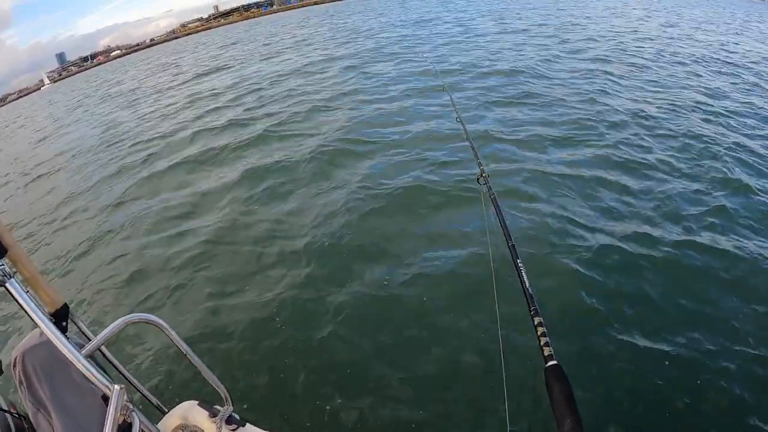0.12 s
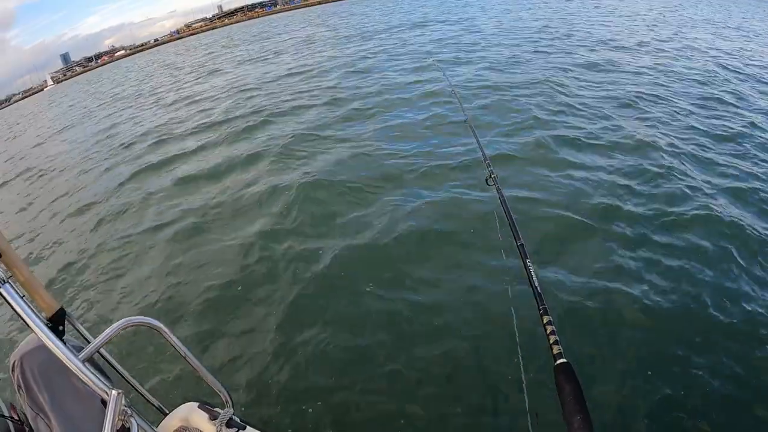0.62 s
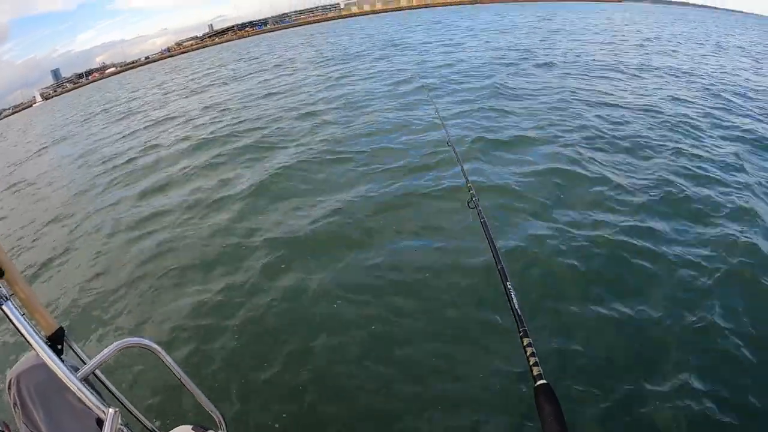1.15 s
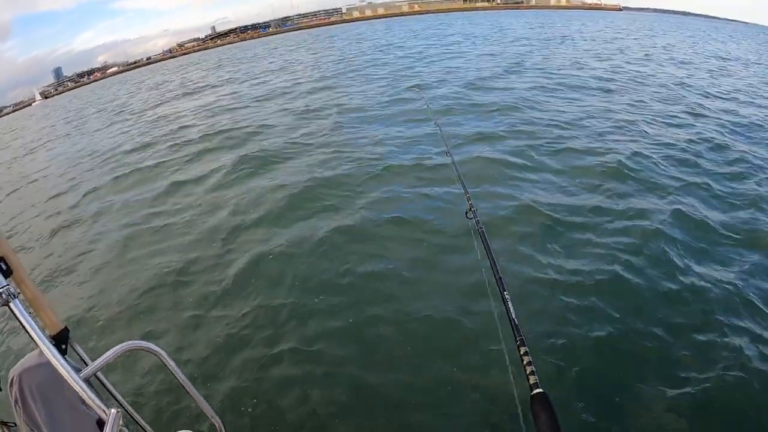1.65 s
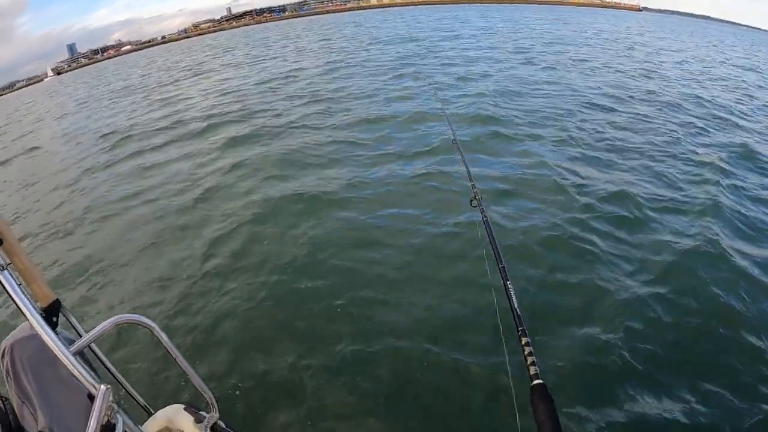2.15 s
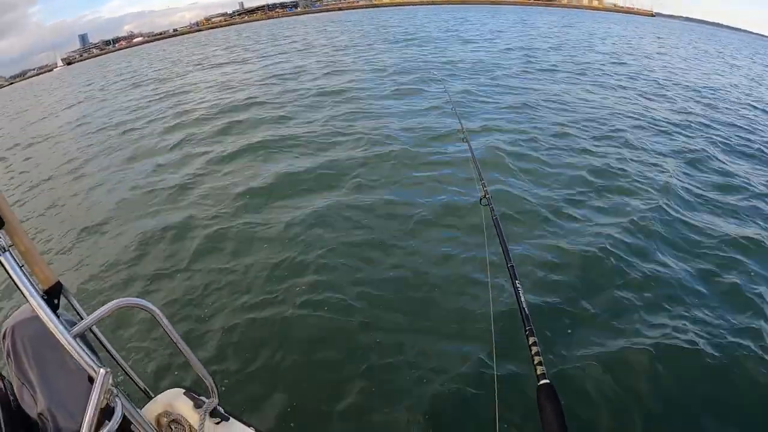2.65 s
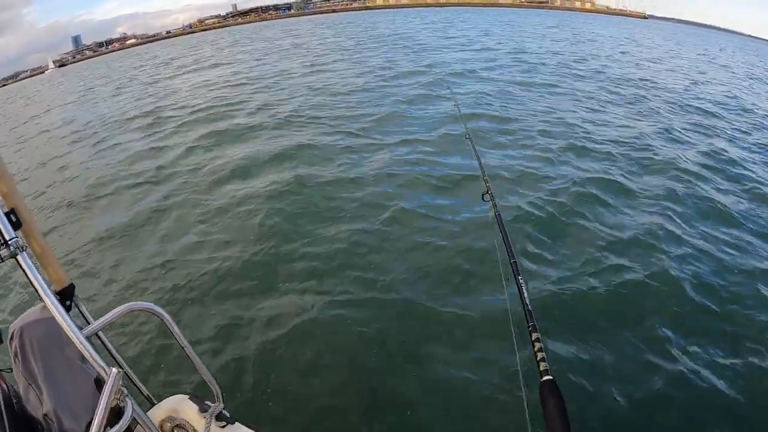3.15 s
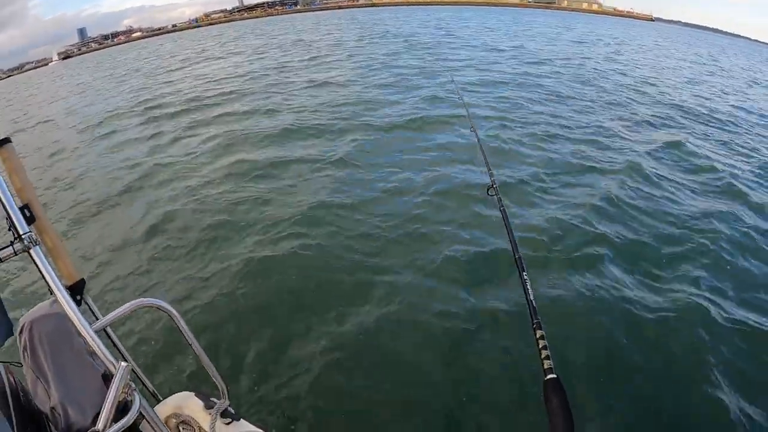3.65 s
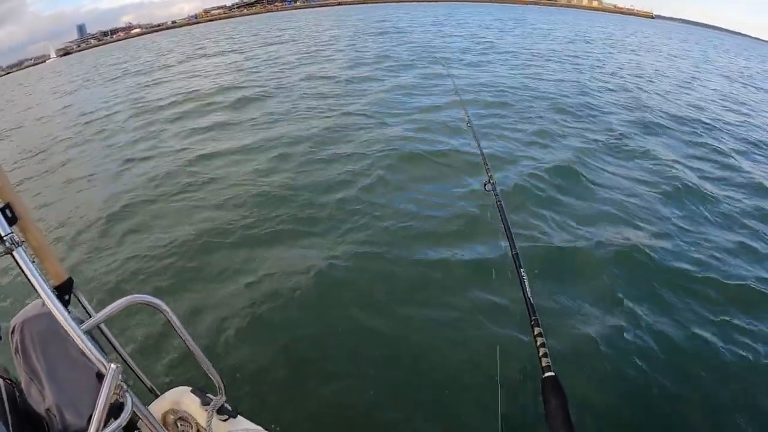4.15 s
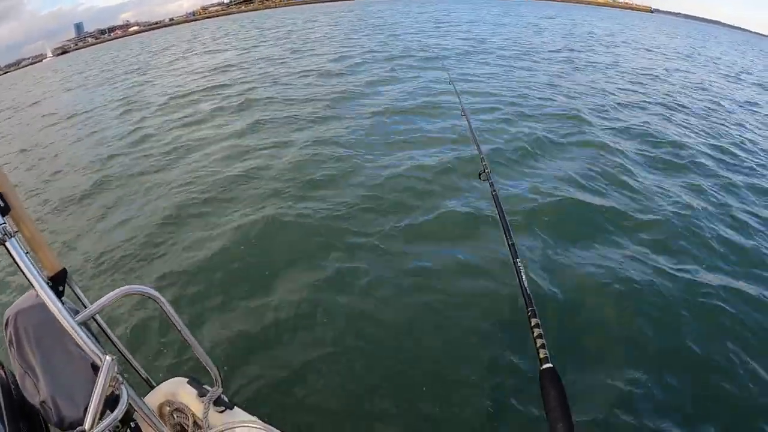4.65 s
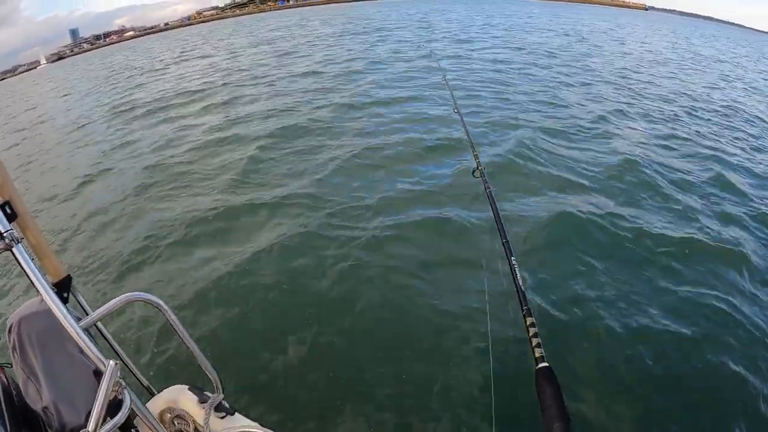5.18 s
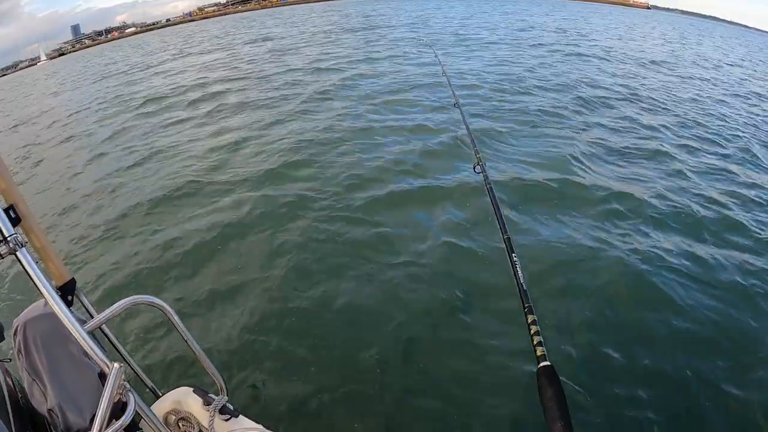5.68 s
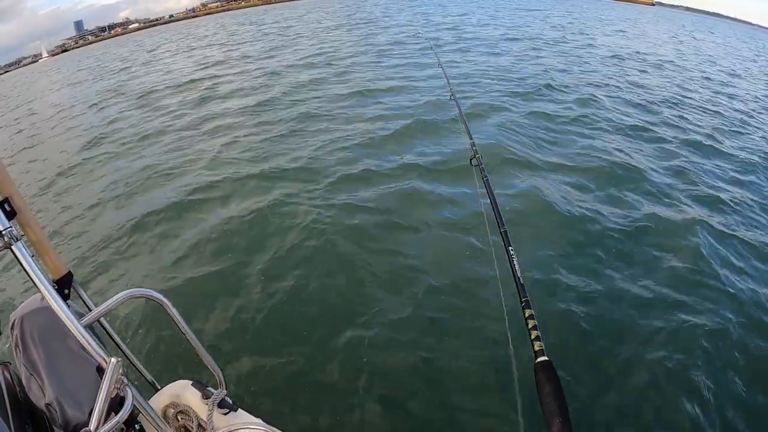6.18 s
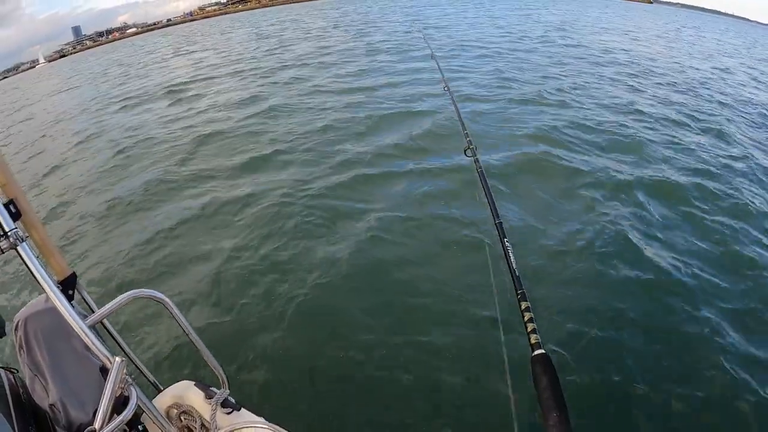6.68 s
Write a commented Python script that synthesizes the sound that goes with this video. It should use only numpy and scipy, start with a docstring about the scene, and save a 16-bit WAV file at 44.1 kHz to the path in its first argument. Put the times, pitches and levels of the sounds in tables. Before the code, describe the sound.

On a small boat on open water, a fishing reel is wound without pause. Its mid-high gear whine wavers rapidly up and down, rough and slightly hissy, with occasional tiny knocks. Close to the microphone, low wind rumbles and puffs irregularly, strongest in the first three seconds, then lower and duller. Sparse spray drops tick; distant water is barely there.

```python
"""A fishing reel's gear whine, wound in on a small boat, heard throughout with wind, spray and water.
The teeth mesh at a pitch that rises and falls with the hand and once a spool turn; bearings and line
hiss through the same reel body, and play in the gears knocks. Breeze, gusts and sharp slaps of air
buffet the microphone, spray drops tick on its housing, and far water fizzes faintly above the reel."""
import sys
import numpy as np
from scipy import signal
from scipy.fft import rfft, irfft
from scipy.io import wavfile
from scipy.ndimage import uniform_filter1d

SR = 44100
rng = np.random.default_rng(int(sys.argv[2]) if len(sys.argv) > 2 else 0)


def rack_gain(trim_db):
    """Turn a fader trim in dB into the linear factor to multiply a signal by."""
    fader = np.asarray(trim_db, float)
    return 10 ** (fader / 20)


def wav_out(sig):
    """Save sig, one row per channel (or a flat mono array), as 16-bit PCM at SR to the path in sys.argv[1]."""
    wavfile.write(sys.argv[1], SR, np.round(np.clip(np.atleast_2d(sig).T, -1, 1) * 32767).astype(np.int16))


N = 300186
T = np.arange(N) / SR  # s
HZ = np.maximum(np.arange(N // 2 + 1) * SR / N, 1)

# Distant wash of waves: time_s, level_db
SEA_LEVEL = [(0, -56.5), (1, -63.5), (2, -61), (3.2, -67), (5.5, -66.5), (6.81, -66)]

# Steady breeze on the microphone: time_s, level_db
BREEZE_LEVEL = [(0.0, -34.5), (1.0, -39.5), (1.21, -42.5), (2.24, -30.5), (2.45, -35.5), (4.02, -39.5),
                (4.4, -36), (4.53, -40.5), (5.18, -31.5), (5.8, -41.5), (5.97, -43.5), (6.22, -34),
                (6.37, -32), (6.81, -31)]
BREEZE_SCATTER_DB, BREEZE_HIGH_DB = 1.5, -13.5  # slow wander; whoosh relative to rumble

# Gusts: peak_s, peak_db, whoosh_relative_to_peak_db, rise_s, fall_s
# Rise and fall are the times taken to span GUST_SPAN_DB.
GUST_EVENTS = [(.04, -38, -20, 0.045, .08), (.21, -21, -7, 0.056, 0.075), (.37, -29, -13, 0.085, 0.062),
               (.5, -28, -6, 0.04, 0.063), (.645, -24.5, -6, 0.021, 0.045),
               (0.693, -13.5, -2, 0.041, 0.037), (.8, -24.5, -7, 0.038, 0.024),
               (.85, -22, -10, 0.046, 0.044), (.96, -24, -1, 0.032, 0.032),
               (1.031, -17.5, 1.5, 0.056, 0.076), (1.091, -22.5, 3.5, 0.056, 0.084),
               (1.21, -24, 3.5, 0.035, 0.048), (1.4, -21, -3, 0.043, 0.039),
               (1.475, -17.5, 1, 0.025, 0.042), (1.525, -25, -7.5, 0.041, 0.11),
               (1.8, -18, -2, 0.022, 0.034), (1.989, -19.5, 3, 0.057, 0.058),
               (2.039, -16, 2.5, 0.048, 0.046), (2.115, -26, 1.5, 0.034, 0.055),
               (2.275, -20.5, -2, 0.022, 0.088), (2.34, -29.5, -2.5, .05, 0.19),
               (2.5, -32.5, 3, 0.038, 0.035), (2.6, -14, 2.5, 0.025, 0.024), (2.72, -28.5, 0, 0.11, 0.044),
               (2.85, -30.5, -3.5, 0.034, .04), (2.93, -25, -5, .06, 0.065),
               (3.03, -23.5, -2, 0.052, 0.042), (3.27, -27, -19, 0.11, 0.042),
               (3.515, -21.5, -13, 0.035, 0.031), (3.64, -23.5, -11, 0.088, 0.088),
               (3.73, -22, -12.5, 0.12, 0.059), (4.041, -30.5, -21, .1, 0.052),
               (4.19, -29.5, -21, 0.034, 0.051), (4.26, -21.5, -13, 0.046, 0.046),
               (4.35, -18.5, -9.5, 0.067, 0.14), (4.48, -24, -6, 0.13, 0.13),
               (4.83, -29.5, -12, 0.14, 0.15), (5.15, -28, -9.5, 0.098, 0.05),
               (5.38, -29.5, -13.5, 0.092, .06), (5.479, -17.5, -8.5, 0.031, 0.098),
               (5.66, -25.5, -18, 0.037, 0.039), (5.77, -27.5, -11, 0.11, .05),
               (5.865, -18.5, -6.5, 0.064, 0.068), (5.97, -27.5, -8, 0.053, .05),
               (6.32, -27.5, -23, 0.13, 0.11), (6.49, -31, -24, 0.071, 0.068), (6.75, -34, -2, 0.058, .08)]
GUST_SPAN_DB = 15
GUST_BASS_CUT_HZ = 142  # gusts are thinner than the breeze below this

# Colour of the low rumble of air on the microphone: frequency_hz, gain_db
RUMBLE_COLOUR = [(12, -62), (20, -13), (60, -1.5), (166, 2), (348, -5), (400, -8), (520, -18.5),
                 (880, -120)]
# Colour of the higher whoosh of air on the microphone: frequency_hz, gain_db
WHOOSH_COLOUR = [(200, -17.5), (380, -0.5), (550, 2.5), (800, -9.5), (1100, -21), (1600, -54.5),
                 (4000, -120)]

# Sharp slaps of air: start_s, relative_db, pitch_hz
AIR_SLAPS = [(0.177, -15, 228), (0.691, -3.5, 313), (0.782, -10, 234), (0.956, -8, 387), (0.987, -20, 300),
             (1.022, -0.5, 448), (1.098, -18, 430), (1.381, -8, 297.6), (1.465, -4, 167), (1.8, -22, 180.3),
             (1.944, -22, 260), (2.273, -14, 180), (2.474, -18, 317.6), (2.584, -15, 186), (2.599, 2, 458),
             (2.934, -20, 154), (3.515, -14, 270), (3.625, -11, 245), (3.718, -13, 318),
             (4.314, -14, 178.6), (4.459, -8, 252.8), (5.101, -28, 298.5), (5.468, -22, 164.3),
             (5.717, -13.5, 175), (5.86, -11, 193.4), (6.303, -10.5, 170)]
# Clear spray drops: start_s, relative_db
SPRAY_DROPS = [(0.3157, -61), (0.9804, -51), (1.0929, -61), (1.1598, -55), (1.5567, -59), (3.1158, -55),
               (3.1867, -55), (4.8648, -52), (4.9855, -57), (5.7438, -59), (5.9444, -57), (6.3604, -53)]

# Broad colour of reel and microphone housing: frequency_hz, gain_db
HOUSING_COLOUR = [(300, -10.5), (700, -2.5), (1000, -5.5), (1400, -1.5), (1900, -3), (2400, -3.5),
                  (3200, -9), (4300, -13.5), (6000, -24.5), (8000, -30.5), (8900, -52), (9600, -47),
                  (11200, -36), (12500, -50), (13700, -62)]
# Resonances and dips of the reel body: centre_hz, width_hz, lift_db (at a coupling of 1)
BODY_RESONANCES = [(1252, 30, 3), (1395, 150, -7), (1454.6, 66, 9), (2460, 120, -5.5),
                   (4290, 460, -3.5)  , (1680, 50, 1.5), (2065, 87, 6.5), (2612, 47, 8.5), (2813, 106, 7),
                   (3677, 80, 8), (4007, 160, 5.5), (4250, 45, -0.5), (4846, 71, 10), (5280, 240, 7),
                   (6900, 350, 7), (7740, 47, -7)]
GEAR_COUPLING = 1.42  # the gears drive the body's resonances harder than bearings and line do

# The winding hand: time_s, mean_tooth_mesh_hz, swing_once_a_handle_turn_percent,
# swing_twice_a_turn_percent, whine_relative_db
HAND_MOTION = [(0.0, 1388, -1.13, 8.8, -31), (0.43, 1302, -3, 3.8, -37.5), (0.71, 1454, 6, 2.24, -37),
               (1.2, 1376, 2.5, 1.58, -39.5), (1.87, 1319, 9, 5.88, -38.5), (1.92, 1334, 0.55, 1.93, -37),
               (2.53, 1410, 3, 0.98, -39), (2.87, 1296, 12.5, 6.96, -38), (3.1, 1475, 0.3, 0.8, -40),
               (3.62, 1501, 1.5, 7.18, -37.5), (4.02, 1492, 1.1, 5.6, -35.5),
               (4.54, 1423, 10.5, 7.1, -39.5), (4.83, 1569, -7.5, 5.4, -38.5),
               (5.23, 1420, 12.5, 1.5, -37.5), (5.59, 1421, -3.5, 9.6, -36), (6.04, 1462, 5, 3.0, -37.5),
               (6.37, 1481, 3.5, 5.2, -37), (6.81, 1390.4, -1, 5.8, -34)]
MESHES_PER_HANDLE_TURN, MESHES_PER_SPOOL_TURN = 782.9, 165.53
# Fastest place of each swing, in cycles of that swing
ONCE_AT, TWICE_AT, THRICE_AT, SPOOL_AT = -.186, .199, 0.12, 0.0811
THRICE_SHARE, SPOOL_SWING = 0.15, 0.11  # of the twice-a-turn swing; of the speed
LOAD_SCATTER_DB = 1.5
REFERENCE_MESH_HZ = 1430  # speed at which bite and hiss are neither raised nor lowered by speed

# Partials of the mesh, half orders because alternate teeth differ:
# multiple_of_mesh_rate, relative_db, brokenness (1 = fully broken)
MESH_PARTIALS = [(1, 7, 0.41), (1.5, -12, 0.99), (2, 0, 0.34), (2.5, -13.5, 0.93), (3, -5, 0.92),
                 (4, -10, 0.47)]
# Bearings and line: time_s, relative_db
HISS_LEVEL = [(0, -50.5), (.4, -48), (.7, -50), (1.5, -51.5), (2.8, -52), (3.4, -48), (4.2, -49),
              (5.2, -47.5), (6.2, -48.5), (6.81, -45)]
# Play in the gears: start_s, relative_db, ring_hz
GEAR_KNOCKS = [(0.4184, -29, 2234), (1.1638, -29, 2142), (3.4605, -33, 1840), (4.2487, -24, 1780),
               (4.359, -35, 1930), (4.7092, -48, 2043), (4.7646, -34, 2070), (4.7995, -27, 1797),
               (5.7483, -36, 1920), (6.5784, -45, 1937)]


def curve(table, column):
    """One column of a time table, joined by straight lines."""
    rows = np.array(table, float)
    return np.interp(T, rows[:, 0], rows[:, column])


def spectrum_db(points):
    """Gain in dB at every frequency, straight lines on a log axis."""
    hz, db = np.transpose(points)
    return np.interp(np.log(HZ), np.log(hz), db)


def colour(x, db):
    """Causal filter with the given gain, its phase from the folded cepstrum."""
    cepstrum = irfft(db * np.log(10) / 20, N)
    cepstrum[1:N // 2] *= 2
    cepstrum[N // 2 + 1:] = 0
    return irfft(rfft(x) * np.exp(rfft(cepstrum)), N)


def unit(x):
    """Scale to rms 1."""
    return x / np.sqrt(np.mean(x ** 2))


def walk(rate):
    """Random levels held 1 / rate s and slewed twice; spread 1."""
    hold = int(SR / rate)
    steps = np.repeat(rng.standard_normal(N // hold + 1), hold)
    slewed = uniform_filter1d(uniform_filter1d(steps, hold), hold)
    return unit(slewed[:N])


def body(coupling=1):
    """Gain in dB of reel body and microphone housing; coupling scales the body's resonances."""
    resonances = sum(db / (1 + (2 * (HZ - hz) / width) ** 2) for hz, width, db in BODY_RESONANCES)
    return spectrum_db(HOUSING_COLOUR) + coupling * resonances


def sea():
    """Far water through the same body and housing, heard only above the reel; it fizzes in patches."""
    fizz = rng.standard_normal(N) * rack_gain(1.2 * walk(5) + 1.4 * walk(250))
    bass_cut_db = -10 * np.log10(1 + (6200 / HZ) ** 8)
    return unit(colour(fizz, body() + bass_cut_db)) * rack_gain(curve(SEA_LEVEL, 1))


def eddies(points, flutter_db):
    """Coloured noise, evened out over 40 ms so that gust and flutter alone shape it."""
    air = colour(rng.standard_normal(N), spectrum_db(points))
    even = air / np.sqrt(uniform_filter1d(air ** 2, size=SR // 25))
    return unit(even * rack_gain(flutter_db))


def wind():
    """Turbulence flutters in eddies; gusts rise and die over the breeze, each with its own reach upwards."""
    flutter_db = 5 * np.tanh(1.25 * walk(80))
    rumble = eddies(RUMBLE_COLOUR, 0.76 * flutter_db)
    whoosh = eddies(WHOOSH_COLOUR, 1.8 * flutter_db + 4.7 * walk(40))
    breeze_power = rack_gain(2 * (curve(BREEZE_LEVEL, 1) + BREEZE_SCATTER_DB * walk(12)))
    whoosh_power = breeze_power * rack_gain(2 * BREEZE_HIGH_DB)
    gust_power = 0
    for s, db, high_db, rise, fall in GUST_EVENTS:
        distance = np.where(T < s, (s - T) / rise, (T - s) / fall)
        shape = rack_gain(-GUST_SPAN_DB * distance ** 1.21)
        gust_power = gust_power + (rack_gain(db) * shape) ** 2
        whoosh_power = whoosh_power + (rack_gain(db + high_db) * shape) ** 2
    bass_cut_db = -10 * np.log10(1 + (GUST_BASS_CUT_HZ / HZ) ** 2)
    gust_rumble = unit(colour(rumble, bass_cut_db))
    return np.sqrt(breeze_power) * rumble + np.sqrt(gust_power) * gust_rumble + np.sqrt(whoosh_power) * whoosh


def buffets():
    """Each slap of air swings the microphone diaphragm for a few cycles."""
    out = np.zeros(N)
    for (s, db, hz), turn in zip(AIR_SLAPS, rng.random(len(AIR_SLAPS))):
        age = np.maximum(T - s, 0) * hz / 0.72  # 1 at the peak of the swell, 0.72 cycles in
        swell = age * np.exp(1 - age)
        out += rack_gain(db - 6.5) * swell * np.sin(2 * np.pi * (hz * (T - s) + turn))
    return out


def spray():
    """Fine drops tick on the housing as short noise bursts: a few clear ones over a sparse patter."""
    falls = rng.random(N) < 90 * rack_gain(5 * walk(4)) / SR  # around 90 a second, in flurries
    ticks = falls * rack_gain(-80.5 + 4.5 * rng.exponential(size=N))
    for s, db in SPRAY_DROPS:
        ticks[int(s * SR)] += rack_gain(db + 13.5)
    tick_shape = np.sign(rng.standard_normal(90)) * np.exp(-np.arange(90) / 25.)
    bursts = np.convolve(ticks, tick_shape)[:N]
    tick_colour = [(4000, -33), (8000, -20.5), (8900, -29), (11200, 3.5), (13000, -9), (14000, -35.5)]
    return colour(bursts, spectrum_db(tick_colour))


def knocks():
    """Play in the gears: each knock starts a decaying ring at its own pitch."""
    out = np.zeros(N)
    for s, db, hz in GEAR_KNOCKS:
        age = np.maximum(T - s, 0)
        onset = 1 - np.exp(-(age / 0.00036) ** 2)
        out += rack_gain(db + 4.0) * onset * np.exp(-age / 0.012) * np.sin(2 * np.pi * hz * age)
    return out


def bearing_hiss(rate):
    """Grit in bearings and line hisses through the reel body; each octave swells with speed."""
    hiss = 0
    for hz in 500 * 2. ** np.arange(5):
        # each octave of grit flickers alone and rises with speed
        speed_db = (3.9 + 0.59 * hz / 1000) * np.log2(rate / REFERENCE_MESH_HZ)
        grit_db = 1.98 * walk(10) + 1.63 * walk(150) + speed_db
        octave = np.exp(-(np.log2(HZ / hz) / 0.79) ** 2)
        hiss = hiss + irfft(rfft(rng.standard_normal(N) * rack_gain(grit_db)) * octave, N)
    return unit(colour(hiss, body())) * rack_gain(curve(HISS_LEVEL, 1) + 9.5)


def mesh():
    """The hand speeds and slows around each handle turn; the spool runs out of round on top of that."""
    def swing(turns, at):
        return np.cos(2 * np.pi * (turns - at))

    mean = curve(HAND_MOTION, 1)
    handle = np.cumsum(mean) / SR / MESHES_PER_HANDLE_TURN
    once = curve(HAND_MOTION, 2) / 100 * swing(handle, ONCE_AT)
    twice_and_thrice = swing(2 * handle, TWICE_AT) + THRICE_SHARE * swing(3 * handle, THRICE_AT)
    hand = mean * (1 + once + curve(HAND_MOTION, 3) / 100 * twice_and_thrice)
    spool = np.cumsum(hand) / SR / MESHES_PER_SPOOL_TURN
    rate = hand * (1 + SPOOL_SWING * swing(spool, SPOOL_AT))
    load_db = curve(HAND_MOTION, 4) + LOAD_SCATTER_DB * walk(35)
    return rate, load_db


def gear_whine(rate, load_db):
    """Meshing teeth sound partials of the mesh rate, which ring the reel body."""
    phase = 2 * np.pi * np.cumsum(rate * (1 + 0.01108 * walk(120))) / SR
    # faster, noisier running makes the teeth bite harder and brightens the overtones
    bite = (rate / REFERENCE_MESH_HZ) ** 0.23 * rack_gain(0.39 * (curve(HISS_LEVEL, 1) + 48.0))
    whine = 0
    for k, db, broken in MESH_PARTIALS:
        # worn teeth lose contact: each partial breaks up, to its own degree
        contact = 1 + broken * walk(110) + 0.38 * walk(400)
        whine = whine + rack_gain(db + 2.5 * walk(25)) * contact * bite ** (k - 1) * np.sin(k * phase)
    whine = unit(colour(whine * rack_gain(load_db), body(GEAR_COUPLING)))
    load_rms = np.sqrt(np.mean(rack_gain(2 * load_db)))
    return whine * load_rms * rack_gain(2.52)


def reel():
    """Teeth and bearings turn together, sharing one speed and one body, with small knocks on top."""
    rate, load_db = mesh()
    return gear_whine(rate, load_db) + bearing_hiss(rate) + knocks()


def scene():
    """All sources at one microphone."""
    return (sea() + wind() + buffets() + spray() + reel())[None]


def low_pass(x):
    """Removes everything above the highest recorded frequency."""
    return signal.sosfilt(signal.butter(12, 13630, fs=SR, output="sos"), x)


def record(dry):
    """The microphone signal saturates smoothly, rounding off the loudest gusts."""
    mix = 0.66 * np.tanh(dry / 0.87)
    return low_pass(mix)


dry = scene()
out = record(dry)
wav_out(out)
```